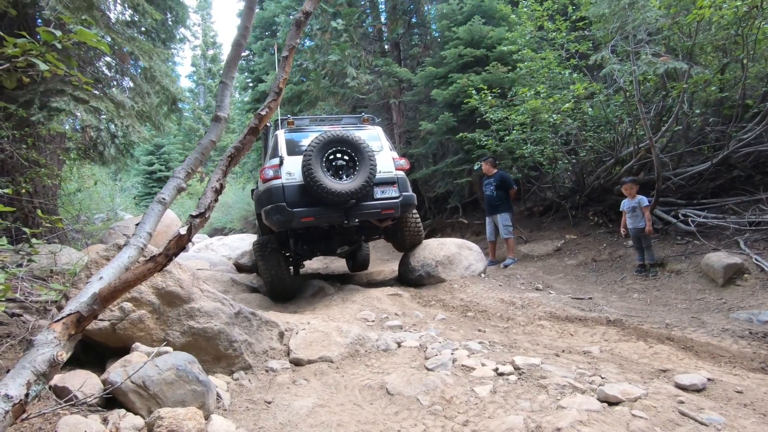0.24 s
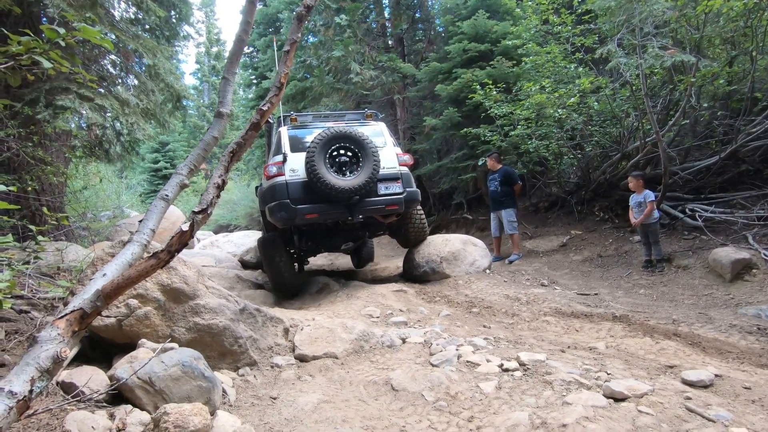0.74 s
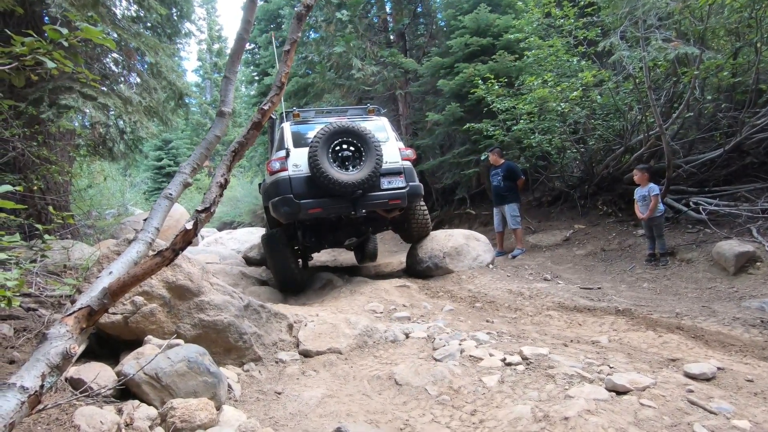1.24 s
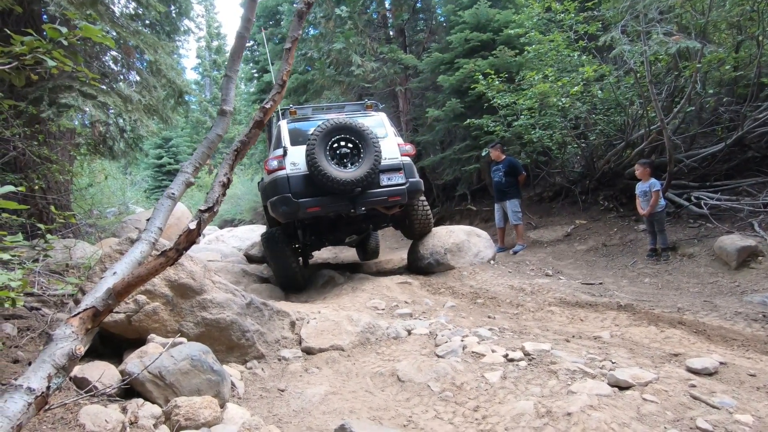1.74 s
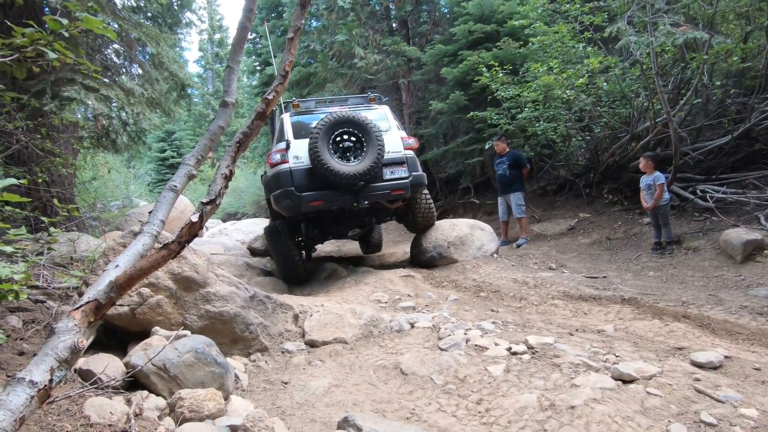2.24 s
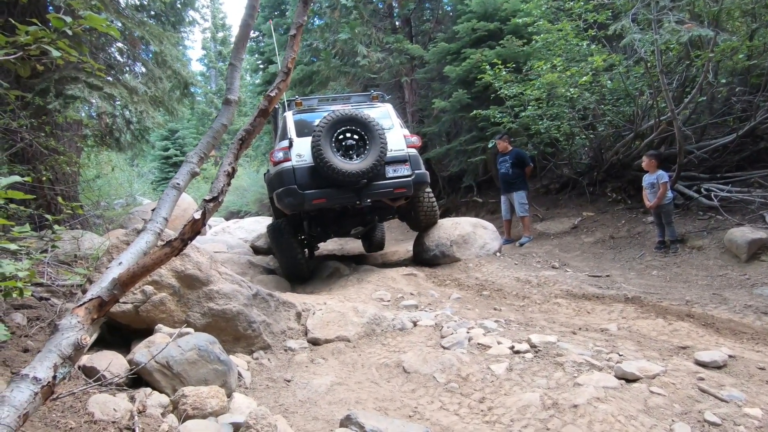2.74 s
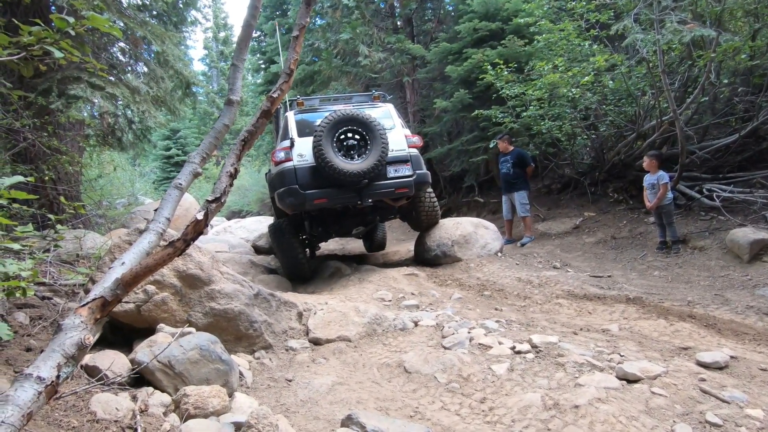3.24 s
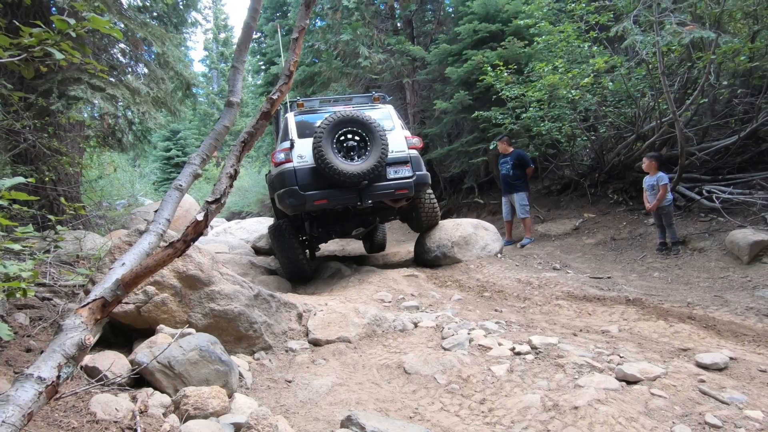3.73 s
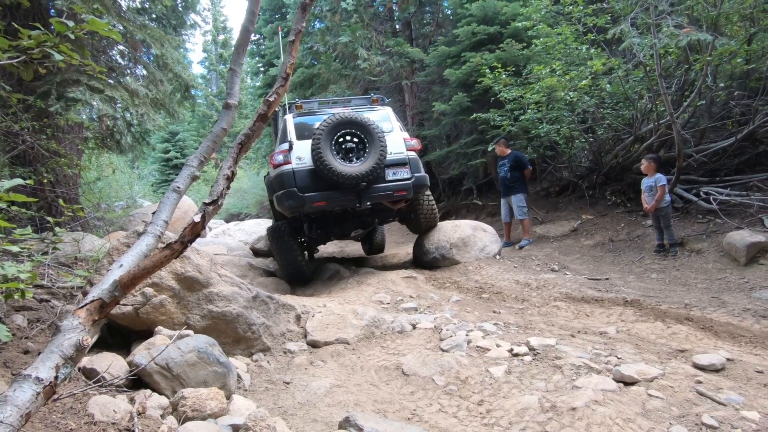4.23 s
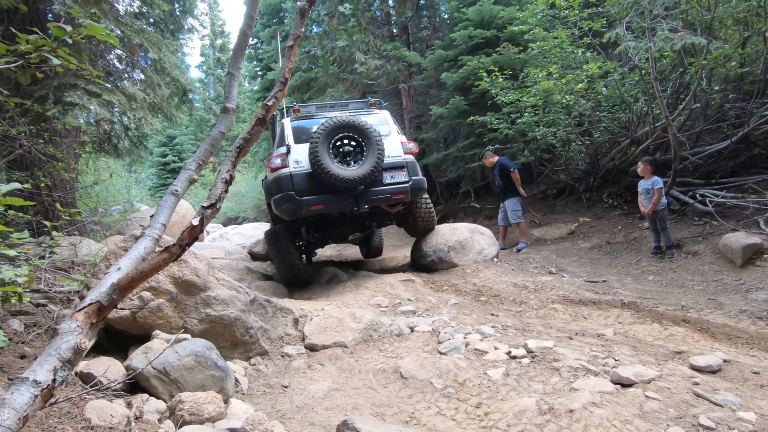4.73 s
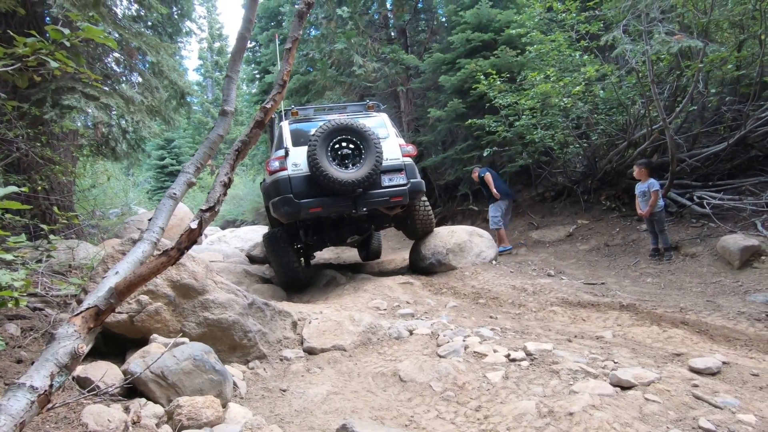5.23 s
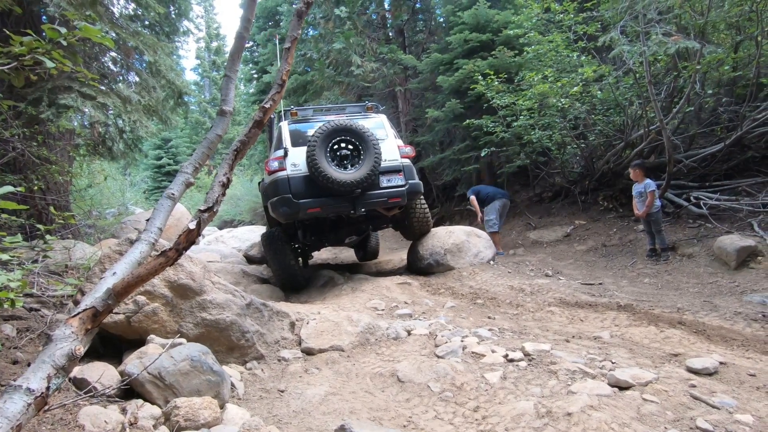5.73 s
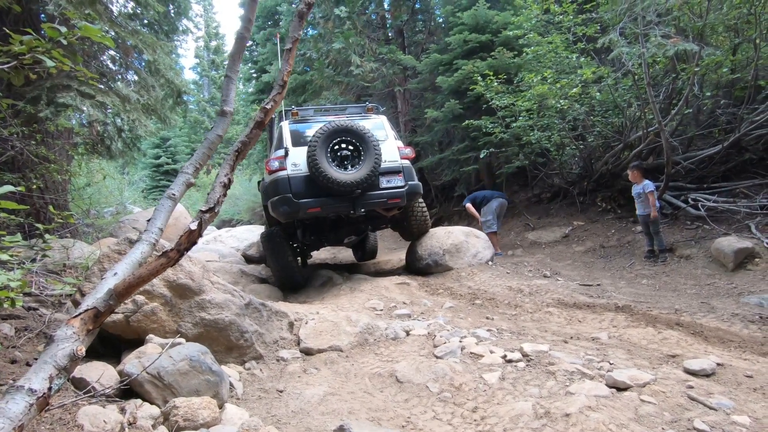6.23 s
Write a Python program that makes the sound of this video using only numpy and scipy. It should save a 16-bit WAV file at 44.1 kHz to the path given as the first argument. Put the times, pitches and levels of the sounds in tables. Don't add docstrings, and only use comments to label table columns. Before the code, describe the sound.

On a dirt trail among trees, a truck seen from behind booms through its exhaust while tyres grind on rock with grit snaps and dull knocks. Within about a second and a half the engine sags to a soft lope with a low thud. Fan hiss, belt whine and faint shoe scuffs remain, a twig snaps nearby, then the engine climbs again. Small stereo microphone several metres back, outdoors and dry.

```python
import sys
import numpy as np
from scipy import signal
from scipy.fft import rfft, irfft
from scipy.io import wavfile

SR = 44100
rng = np.random.default_rng(int(sys.argv[2]) if len(sys.argv) > 2 else 0)


def undo_db(level):
    steps = np.asarray(level, float) / 20
    return 10 ** steps


def int16_out(signal):
    q = np.round(np.clip(np.atleast_2d(signal).T, -1, 1) * 32767)
    wavfile.write(sys.argv[1], SR, q.astype(np.int16))


N = 285306
T_S = np.arange(N) / SR
HZ = np.maximum(np.fft.rfftfreq(N, 1 / SR), 1)
HALF_PAN = np.array([[.5], [-.5]])

# time in seconds, firings per second of one bank.
CRANK_SPEED = [(0.0, 31.03), (0.32, 32.3), (0.88, 30.08), (1.22, 23.85), (1.6, 20.23), (1.88, 20.01),
               (2.5, 18.69), (2.98, 18.14), (4.06, 18.27), (4.34, 19.6), (4.56, 19.53), (5.12, 18.59),
               (5.68, 26.02), (6.0, 26.86), (6.16, 29.37), (6.4, 29.76)]
# time in seconds, firing level in dB, imbalance of the banks in dB.
THROTTLE = [(0.0, -10.5, -14), (0.3, -16.5, 0), (0.6, -13, -12), (0.9, -13, -13.5), (1.05, -17, -12.5),
            (1.3, -20, -10.5), (1.5, -25, -7), (1.8, -24.5, -13), (2.4, -27, -6), (3.9, -26.5, -9.5),
            (4.15, -24.5, -4.5), (4.4, -26.5, -8.5), (5.1, -26, -4.5), (5.3, -20, -12.5), (5.55, -15, -11),
            (5.88, -13.5, -16), (6.1, -12, -11.5), (6.47, -13, -11)]


def rms_one(x):
    return x / np.sqrt(np.mean(x ** 2) + 1e-20)


def in_time(rows):
    s, *columns = np.transpose(rows)
    return [np.interp(T_S, s, column) for column in columns]


def at_hz(points, hz=HZ):
    point_hz, value = np.array(points).T
    return np.interp(np.log(hz), np.log(point_hz), value)


def colour(x, spectrum):
    return irfft(rfft(x) * undo_db(at_hz(spectrum)), N)


def minimum_phase(x, spectrum):
    size = len(x)
    hz = np.maximum(np.fft.rfftfreq(size, 1 / SR), 1)
    cepstrum = irfft(at_hz(spectrum, hz) * np.log(10) / 20, size)
    cepstrum[1:size // 2] *= 2
    cepstrum[size // 2 + 1:] = 0
    return irfft(rfft(x) * np.exp(rfft(cepstrum)), size)


def resonate(x, hz, width_hz):
    r = np.exp(-np.pi * width_hz / SR)
    zeros = np.array([1, 0, -1]) * (1 - r * r) / 2
    poles = [1, -2 * r * np.cos(2 * np.pi * hz / SR), r * r]
    return signal.lfilter(zeros, poles, x + 1e-18)


def band(x, hz, width_hz):
    return rms_one(resonate(resonate(x, hz, width_hz), hz, width_hz))


def drift(rate_hz):
    r = np.exp(-80 * np.pi * rate_hz / SR)
    white = rng.standard_normal(N // 40 + 2002)
    slow = signal.lfilter([1], [1, -2 * r, r * r], white)[2000:]
    return np.interp(np.arange(N) / 40, np.arange(len(slow)), rms_one(slow))


def surges(rows, rise_db, fade_db_per_s, rest_db):
    power = undo_db(2 * rest_db)
    for start_s, rise_s, hold_s, peak_db in rows:
        age_s = T_S - start_s
        below_db = rise_db * np.clip(1 - age_s / rise_s, 0, 1)
        faded_db = fade_db_per_s * np.maximum(age_s - rise_s - hold_s, 0)
        power = power + (T_S > start_s) * undo_db(2 * (peak_db - below_db - faded_db))
    return np.sqrt(power)


def exhaust(scatter_db, jitter_s):
    cylinder_db = [-1.6, 0.047, -0.13, 0.91, -2.7, 0.89]
    # frequency in Hz, level in dB.
    pipe = [(25, -55), (37, -29), (46, -12.5), (64, -16), (82, -23), (113, -11), (122, -9), (129, 3),
            (137, -3.5), (148, -12.5), (172, -27.5), (192, -15), (215, -28.5), (250, -23), (300, -50.5)]
    start_turn = 0.305
    weak_bank_lag_s = 0.0012
    pad, lead = 22000, 620

    speed = in_time(CRANK_SPEED)[0]
    firing_db, odd_db = in_time(THROTTLE)
    turns = start_turn + np.cumsum(speed) / SR
    count = np.arange(-24, int(turns[-1]) * 2 + 2)
    known_turns = np.r_[turns[0] - speed[0] * pad / SR, turns]
    at = np.interp(count / 2, known_turns, np.r_[-pad, np.arange(N)])
    chance = rng.standard_normal((len(at), 2))
    shift_s = weak_bank_lag_s * (count % 2 - .5) + jitter_s * chance[:, 0]
    at = np.clip(at + SR * shift_s, -pad, N - 1).astype(int)

    seen = np.maximum(at, 0)
    bank = (1 + undo_db(np.minimum(odd_db[seen], 0)) * (-1.) ** count) / 2
    stroke_db = firing_db[seen] + np.array(cylinder_db)[count % 6] + scatter_db * chance[:, 1]
    size = bank * undo_db(stroke_db)
    pulses = np.zeros(N + 2 * pad)
    pulses[at + pad] = size * SR / speed[seen] / np.sqrt(2)
    pulses = signal.sosfilt(signal.butter(4, 330., fs=SR, output="sos"), pulses)
    return minimum_phase(pulses, pipe)[pad + lead:pad + lead + N]


def grind(per_s, spread_db):
    # frequency in Hz, level in dB per Hz.
    grit_spectrum = [(150, -14.5), (260, 2.5), (291, -18.5), (326, -3.5), (415, -15), (663, -17),
                     (844, -26.5), (1070, -20.5), (1470, -24.5), (1740, -31), (3250, -40.5), (4970, -48.5),
                     (6330, -48), (7720, -60), (10000, -92.5), (17000, -120)]
    # start in seconds, rise in seconds, hold in seconds, peak in dB.
    slips = [
        (0.04, 0.17, 0.26, -47.5),
        (0.33, 0.056, 0.37, -46),
        (0.66, 0.17, 0.11, -43.5),
        (1.19, 0.052, 0.021, -48),
        (6.05, 0.27, .2, -55.5),
    ]
    grain_db = spread_db * np.minimum(rng.exponential(1, (2, N)), 5)
    sizes = undo_db(grain_db) * rng.choice([-1, 1], (2, N))
    born = rng.random((2, N)) < per_s * undo_db(3.0 * drift(18)) / SR
    gain = surges(slips, rise_db=13, fade_db_per_s=83.5, rest_db=-65)
    return undo_db(8.0) * gain * rms_one(colour(sizes * born, grit_spectrum))


def intake_rush():
    # centre in Hz, width in Hz.
    intake_band = (3140, 1870)
    # start in seconds, rise in seconds, hold in seconds, peak in dB.
    gulps = [
        (-.1, 0.021, .15, -56.5),
        (6.03, 0.22, .3, -57.5),
    ]
    gain = surges(gulps, rise_db=13, fade_db_per_s=23, rest_db=-68.5)
    return gain * band(rng.standard_normal((2, N)), *intake_band)


def knocks():
    # start in seconds, peak in dB, frequency in Hz, 60 dB decay in seconds, left-right in dB.
    contacts = [
        (1.79, -21, 63, .3, -1),
        (1.255, -33, 270, .14, -3),
        (.428, -33, 310, .08, -3),
        (.434, -36, 900, .02, -2),
        (.503, -38, 600, .04, -6),
        (1.405, -22, 112, .08, -20),
    ]
    out = np.zeros((2, N))
    for start_s, db, hz, t60_s, pan_db in contacts:
        age_s = np.maximum(T_S - start_s, 0)
        gain = undo_db(db - 60 * age_s / t60_s + pan_db * HALF_PAN)
        soft_start = np.tanh(age_s * hz * 1.1) ** 2
        out += gain * np.sin(2 * np.pi * hz * age_s) * soft_start
    return out


def snaps(decay_s):
    # start in seconds, peak in dB, frequency in Hz, left-right in dB.
    cracked = [(0.368, -45, 5500, -7), (0.4326, -39, 2660, -3), (0.4425, -48, 5800, 3),
               (0.483, -43, 6000, 1), (0.5045, -41, 2500, 3), (0.517, -52, 5500, -10),
               (0.5666, -46, 5000, -7), (0.602, -49.5, 5500, -1), (0.6857, -47, 2760, 3),
               (0.7697, -48, 2520, 3), (0.8665, -51, 5500, 4), (0.898, -45, 6300, 3),
               (0.9257, -53, 5500, 3), (0.9793, -54, 5800, -3), (3.8002, -43, 5200, -14),
               (3.8144, -33.5, 4800, -8), (3.823, -43, 4130, -8)]
    rise_s, length = .0008, 2000
    out, age_s = np.zeros((2, N + length)), np.arange(length) / SR
    envelope = np.exp(-age_s / decay_s) * np.tanh(age_s / rise_s)
    cracks = rng.standard_normal((len(cracked), length)) * envelope
    for (start_s, db, hz, pan_db), crack in zip(cracked, cracks):
        crack = resonate(crack, hz, 2500.) + 0.33 * crack + 0.59 * resonate(crack, 1300., 900.)
        at = round(start_s * SR)
        gain = undo_db(db - 1.0 + np.clip(pan_db, -6, 3) * HALF_PAN)
        out[:, at:at + length] += gain * crack / np.abs(crack).max()
    bandpass = signal.butter(6, [500., 7300.], "band", fs=SR, output="sos")
    return signal.sosfilt(bandpass, out[:, :N])


def machinery():
    # frequency in Hz, level in dB per Hz.
    panel_spectrum = [(18, -36), (35, -18), (60, -6), (100, -12), (135, -13), (190, -11), (250, -12),
                      (300, -22), (500, -35), (700, -60), (1100, -130)]
    # frequency in Hz, level in dB per Hz.
    hiss_spectrum = [(240, -21.5), (400, 1), (573, -28.5), (681, -7), (810, -10.5), (1080, -11.5),
                     (1170, -11), (1280, -13), (1520, -8.5), (2100, -15.5), (3090, -17), (5070, -24),
                     (6250, -17.5), (7720, -29.5), (10000, -72.5), (17000, -120)]
    # frequency in Hz, level in dB per Hz.
    air_spectrum = [(7000, -39.5), (7900, -13), (9000, -0.5), (11000, -4.5), (13500, -21.5), (14200, -37.5)]
    # frequency in Hz, width in Hz, level in dB.
    whines = [
        (1186, 66, -65.5),
        (57.7, 4, -47),
        (75.3, 24, -42.5),
        (2592, 90, -75.5),
        (4360, 83, -83),
    ]
    hiss_db_per_firing_hz, idle_hz = 0.2567, 21.5

    white = rng.standard_normal((3, 2, N))
    rumble_db = -45.5 + .55 * (in_time(THROTTLE)[0] + 27)
    rumble = undo_db(rumble_db) * rms_one(colour(white[0], panel_spectrum))
    hiss = undo_db(-57.5) * rms_one(colour(white[1], hiss_spectrum))
    hiss = hiss + undo_db(-89) * rms_one(colour(white[1], air_spectrum))
    tones = sum(undo_db(db) * band(white[2], hz, width_hz) for hz, width_hz, db in whines)
    swell_db = hiss_db_per_firing_hz * (in_time(CRANK_SPEED)[0] - idle_hz) + 0.54 * drift(9.5)
    return rumble + hiss * undo_db(swell_db) + tones


def scuffs():
    # middle in seconds, level in dB, frequency in Hz, width in Hz, length in seconds.
    puffs = [(.08, -62, 3400, 350, .15), (2.18, -63, 950, 200, .03), (2.95, -68, 3200, 800, .1),
             (3.14, -60, 2200, 2500, .025), (3.24, -58, 1350, 1000, .03), (3.815, -56, 1300, 1000, .015),
             (3.817, -53, 4400, 900, .005), (3.85, -65, 5000, 2500, .03), (5.4, -66, 4500, 1500, .08),
             (6.17, -64, 3500, 1000, .04), (6.38, -57, 1000, 700, .05)]
    white, out = rng.standard_normal((2, N)), np.zeros((2, N))
    for middle_s, db, hz, width_hz, length_s in puffs:
        swell = np.exp(-((T_S - middle_s) / length_s) ** 2)
        out += undo_db(db) * swell * band(white, hz, width_hz)
    return out


def ports(direct, diffuse, table):
    alike, lean_db, lead_rad = (at_hz(np.array(table)[:, [0, k]]) for k in (1, 2, 3))
    shared, own = rfft(direct), rfft(diffuse)
    right = alike * shared * np.exp(-1j * lead_rad) + np.sqrt(1 - alike ** 2) * own
    return irfft(np.array([shared * undo_db(lean_db / 2), right / undo_db(lean_db / 2)]), N)


def scene():
    # frequency in Hz, likeness 0-1, left-right in dB, left lead in rad.
    near = [(60, .99, -.7, -.1), (200, .995, -1.2, -.1), (290, .99, -3, -.1), (400, .96, -4.2, -.1),
            (560, .93, -7.8, .2), (740, .86, -7.4, .7), (970, .8, -2.4, .9), (1240, .87, .2, 1.1),
            (2030, .8, .6, 1), (2580, .76, 1.6, .1), (3600, .85, -1.1, .3), (5500, .55, -1.2, .5),
            (7300, .3, 0, 0)]
    # frequency in Hz, likeness 0-1, left-right in dB,
    # left lead in rad.
    far = [(60, .6, -3, -.1), (120, .8, -1.5, -.1), (290, .75, -3.2, -.1), (400, .55, -3.5, -.2),
           (560, .15, -3.3, .6), (740, .45, -2.8, 2.9), (970, .52, -1.8, 1.8), (1400, .56, -3.5, 1.3),
           (2030, .52, -1, 1.2), (2580, .66, .9, .2), (3600, .82, -1.4, .35), (5500, .42, -2.9, -.1),
           (7300, .15, -1, 0)]
    engine = exhaust(scatter_db=.8, jitter_s=.00015)
    tyres = grind(per_s=2500, spread_db=1.5) + intake_rush()
    around = machinery() + scuffs()
    truck = ports(engine + tyres[0], tyres[1], near)
    return truck + ports(*around, far) + snaps(decay_s=.0045) + knocks()


def roll_off(x):
    return signal.sosfilt(signal.butter(12, 14100, fs=SR, output="sos"), x)


def record(dry):
    overload = .6
    rounded = overload * np.tanh(dry / overload)
    highpass = signal.butter(2, 20., "high", fs=SR, output="sos")
    return roll_off(signal.sosfilt(highpass, rounded))


dry = scene()
out = record(dry)
int16_out(out)
```